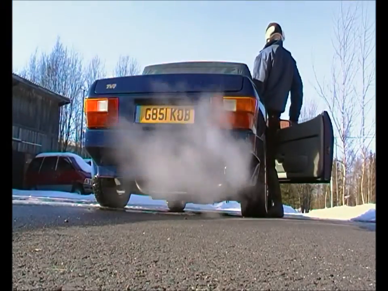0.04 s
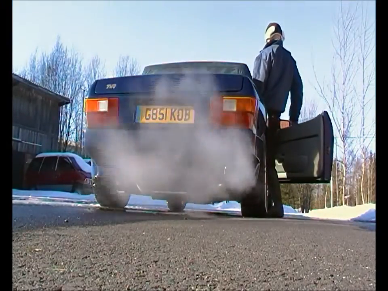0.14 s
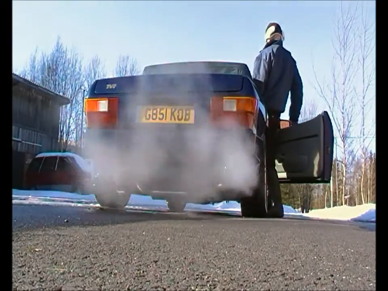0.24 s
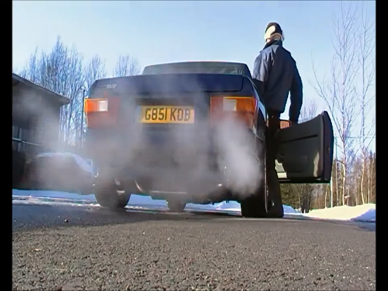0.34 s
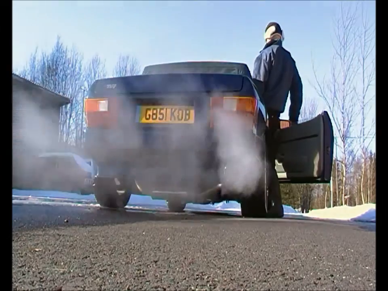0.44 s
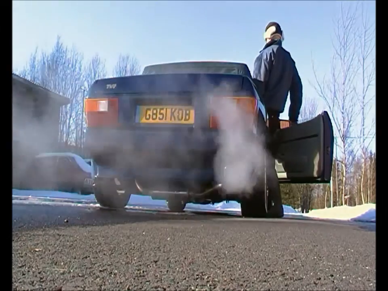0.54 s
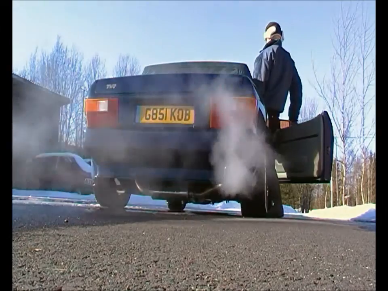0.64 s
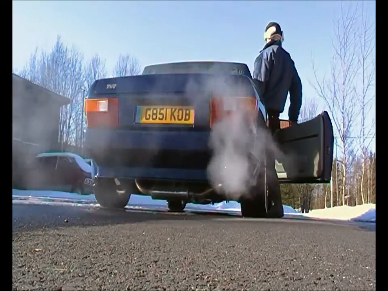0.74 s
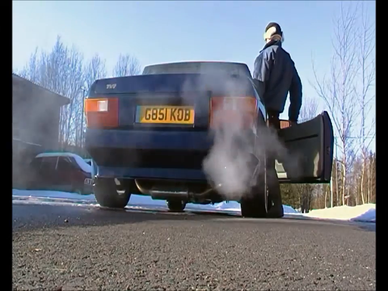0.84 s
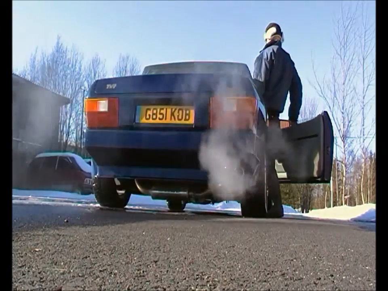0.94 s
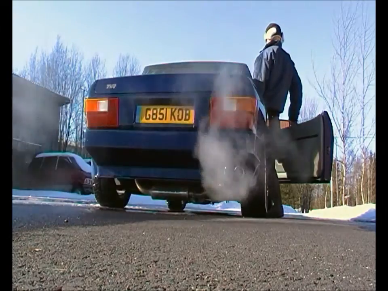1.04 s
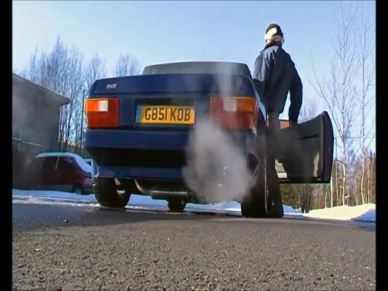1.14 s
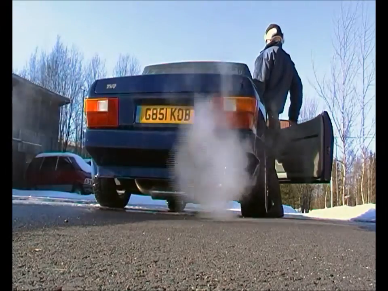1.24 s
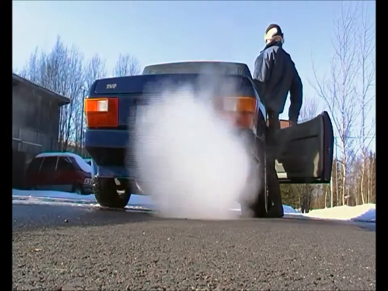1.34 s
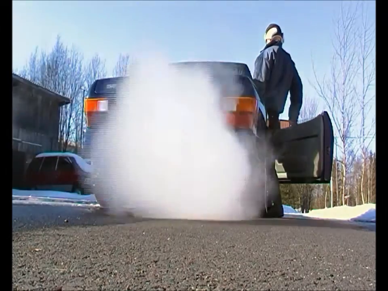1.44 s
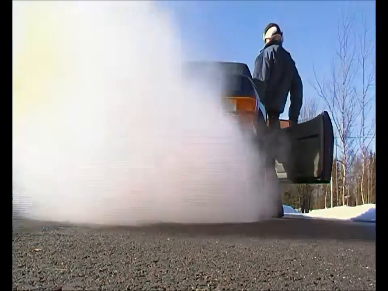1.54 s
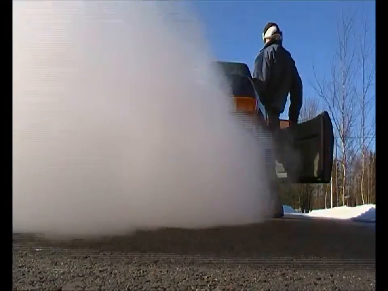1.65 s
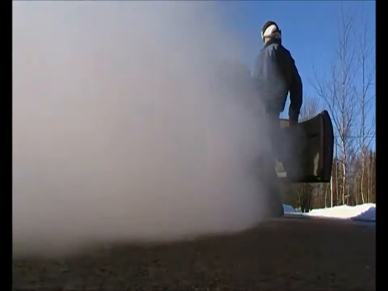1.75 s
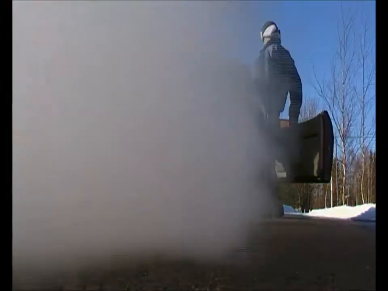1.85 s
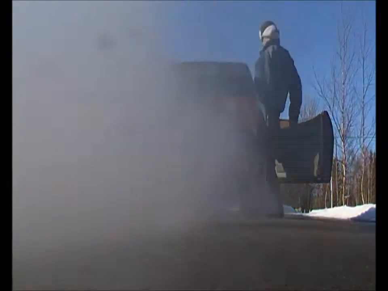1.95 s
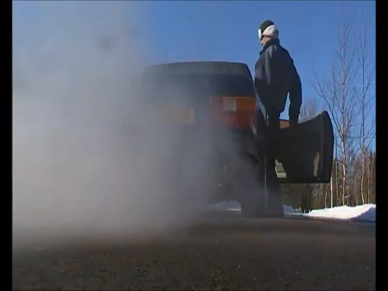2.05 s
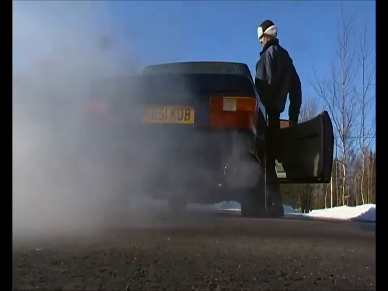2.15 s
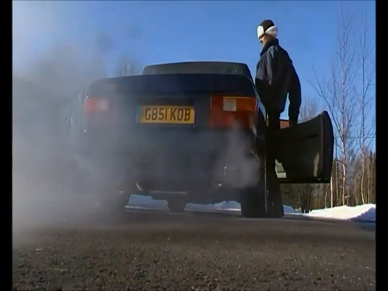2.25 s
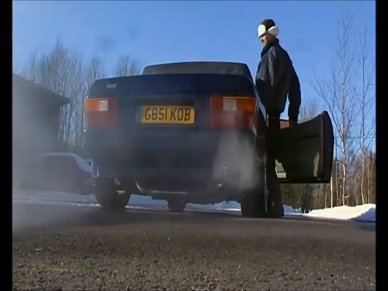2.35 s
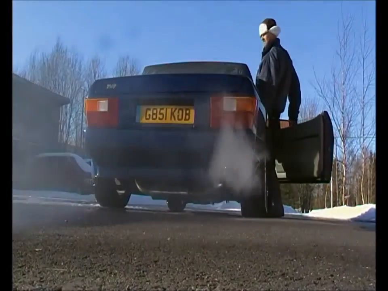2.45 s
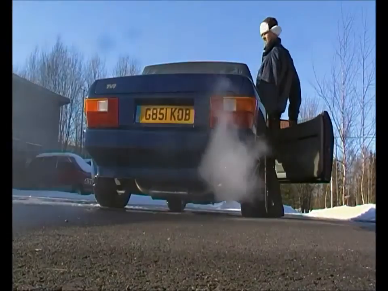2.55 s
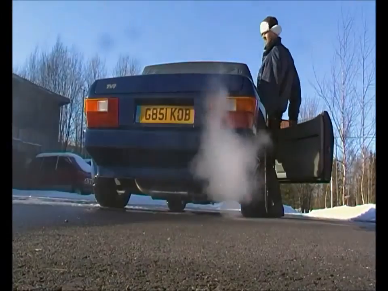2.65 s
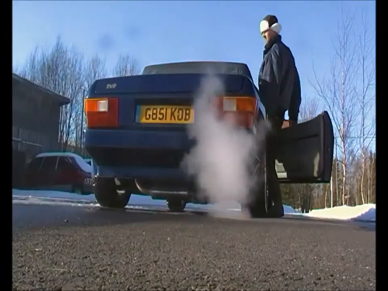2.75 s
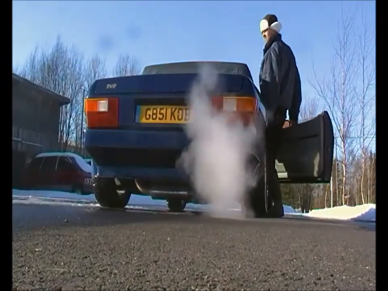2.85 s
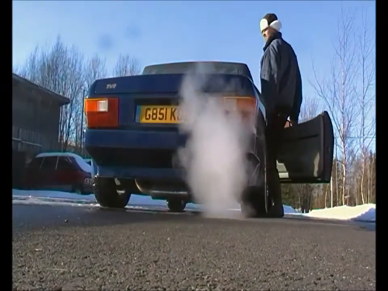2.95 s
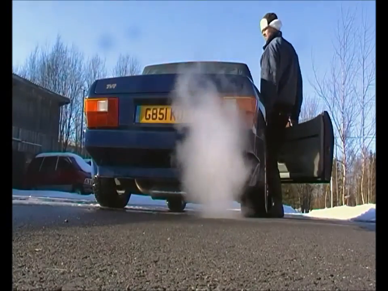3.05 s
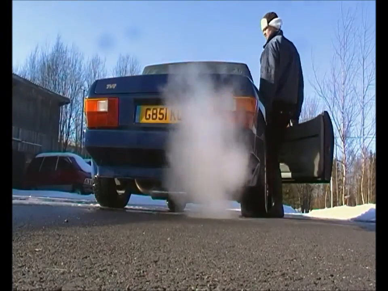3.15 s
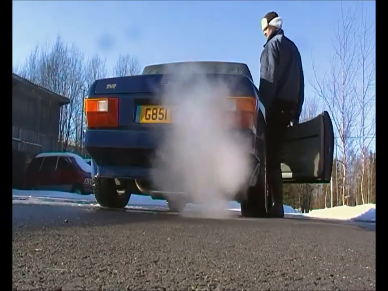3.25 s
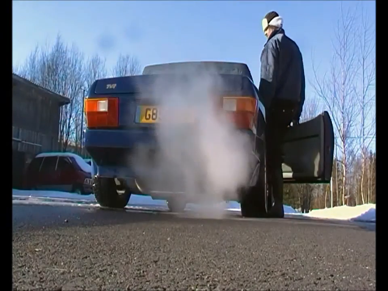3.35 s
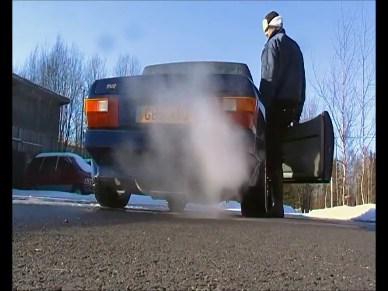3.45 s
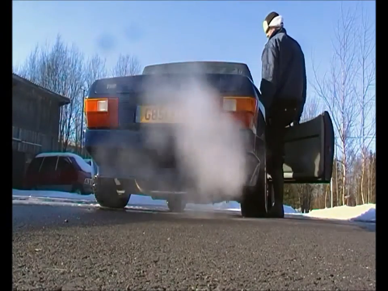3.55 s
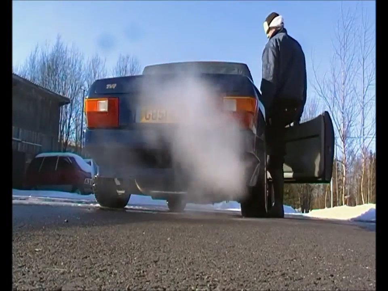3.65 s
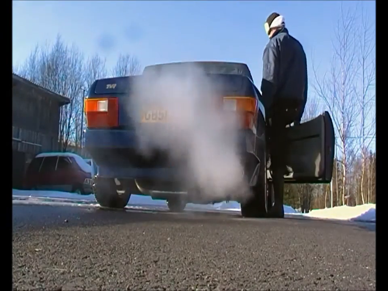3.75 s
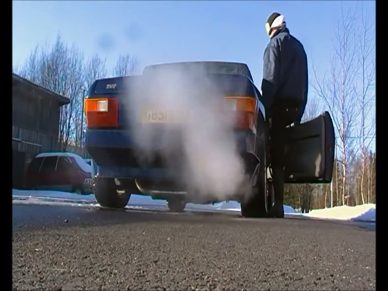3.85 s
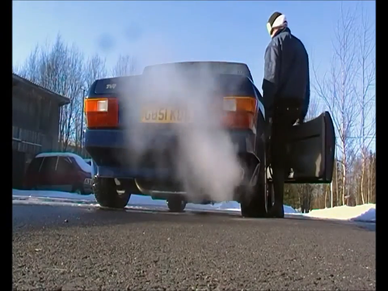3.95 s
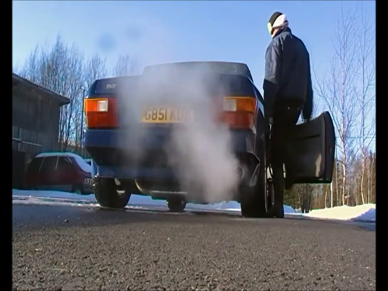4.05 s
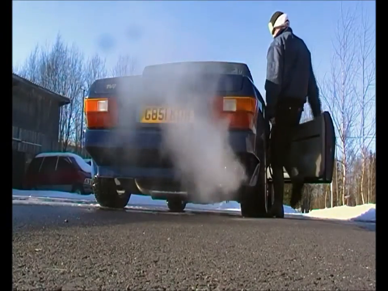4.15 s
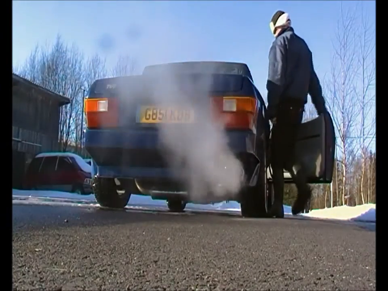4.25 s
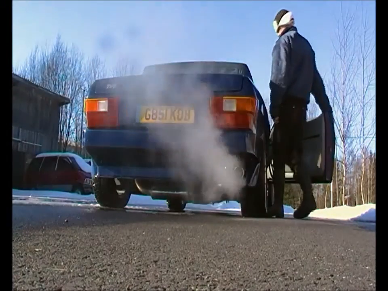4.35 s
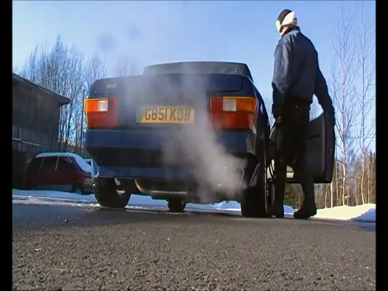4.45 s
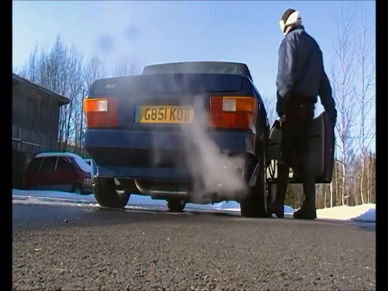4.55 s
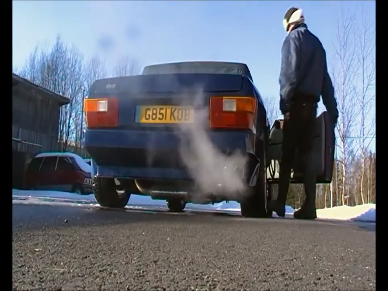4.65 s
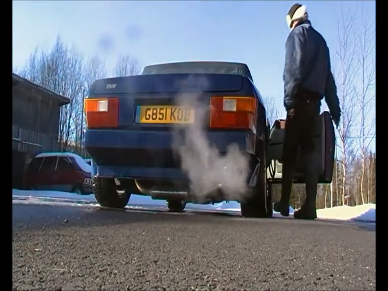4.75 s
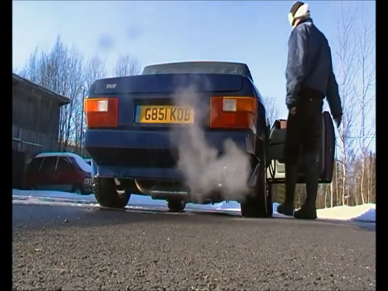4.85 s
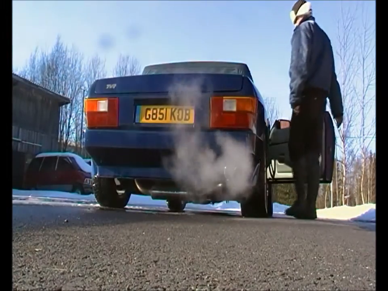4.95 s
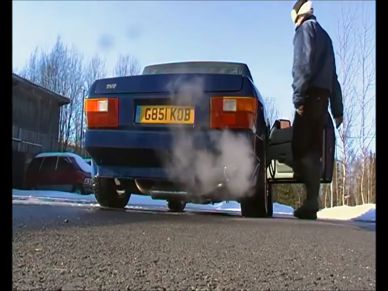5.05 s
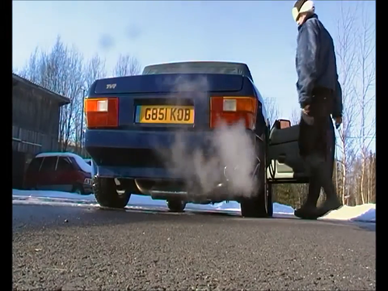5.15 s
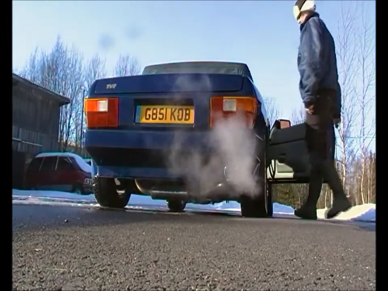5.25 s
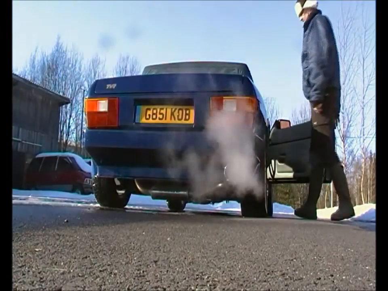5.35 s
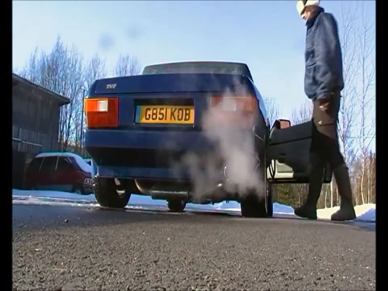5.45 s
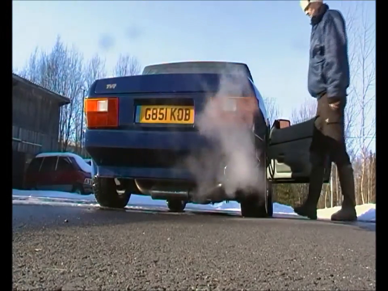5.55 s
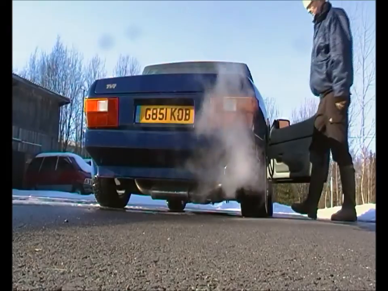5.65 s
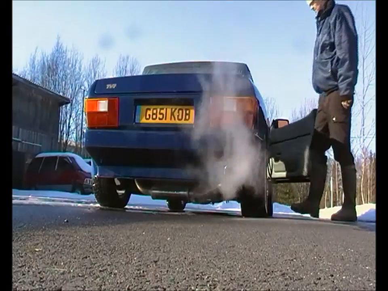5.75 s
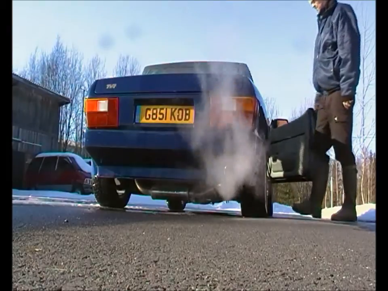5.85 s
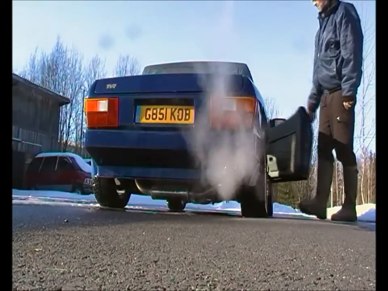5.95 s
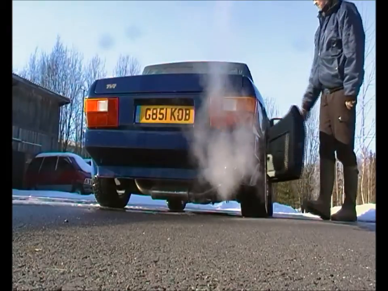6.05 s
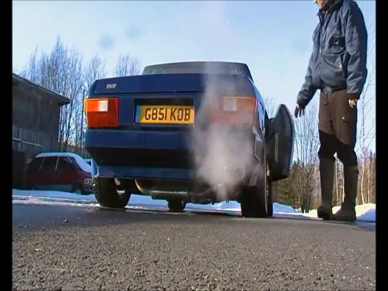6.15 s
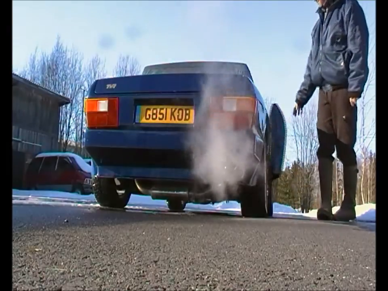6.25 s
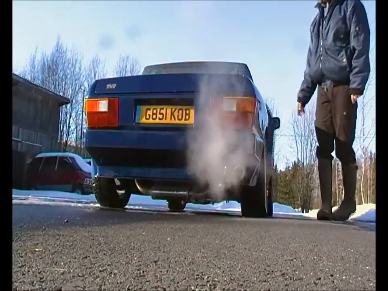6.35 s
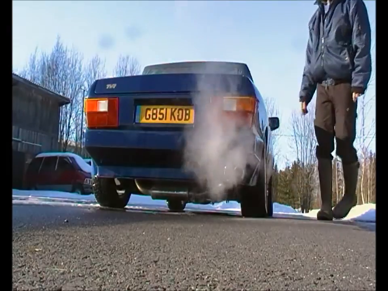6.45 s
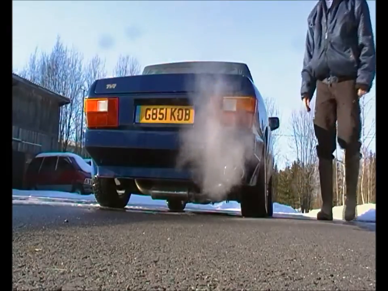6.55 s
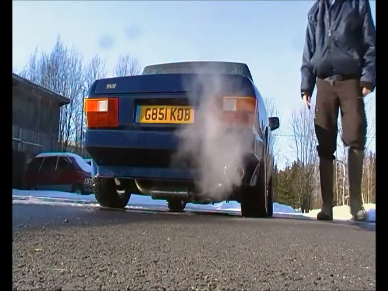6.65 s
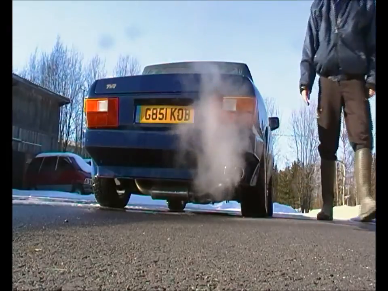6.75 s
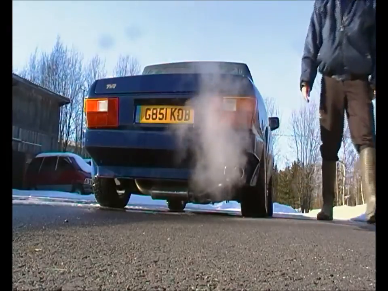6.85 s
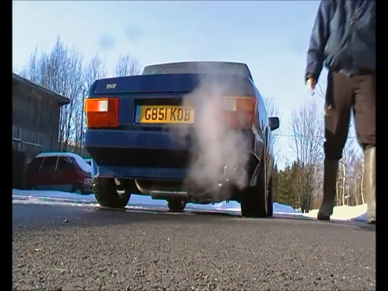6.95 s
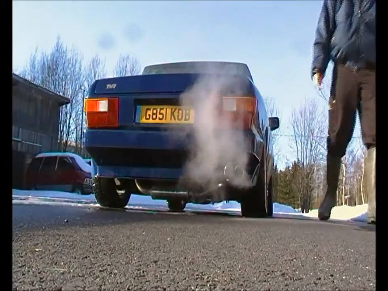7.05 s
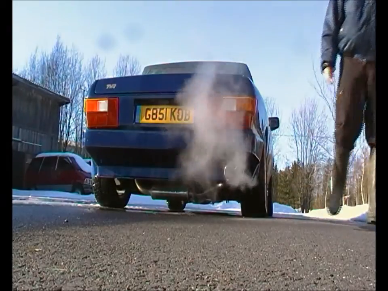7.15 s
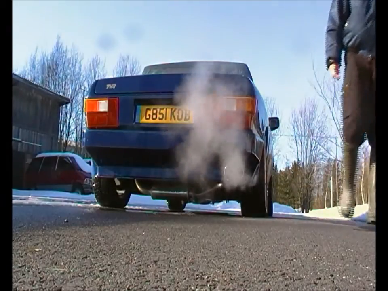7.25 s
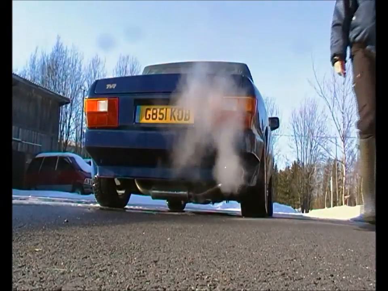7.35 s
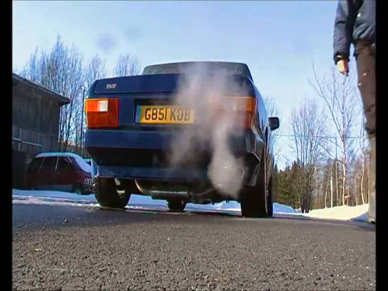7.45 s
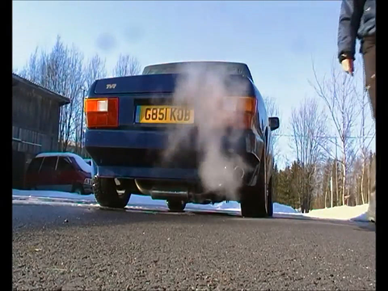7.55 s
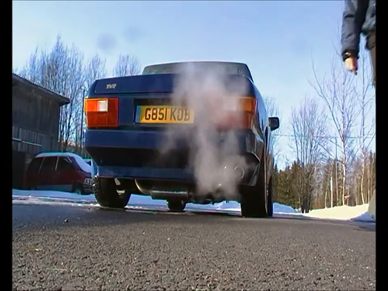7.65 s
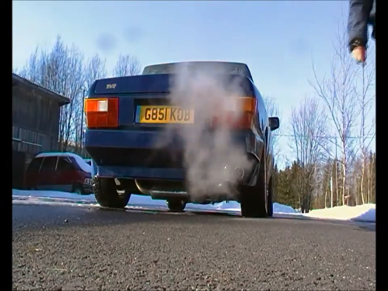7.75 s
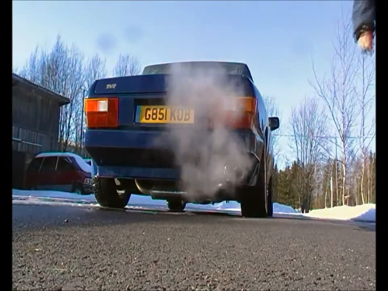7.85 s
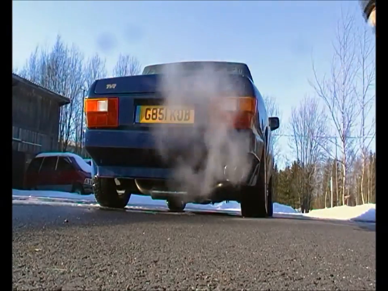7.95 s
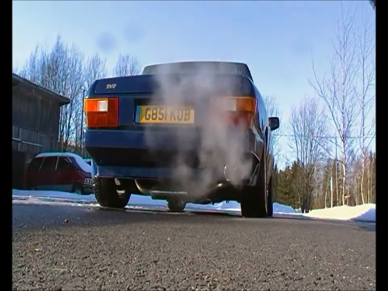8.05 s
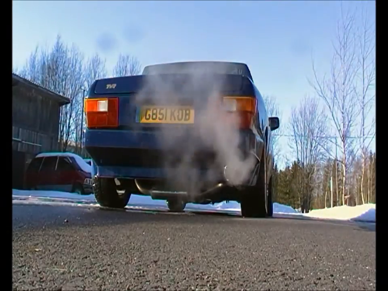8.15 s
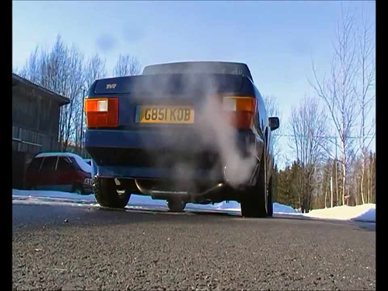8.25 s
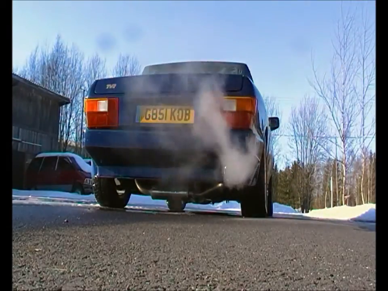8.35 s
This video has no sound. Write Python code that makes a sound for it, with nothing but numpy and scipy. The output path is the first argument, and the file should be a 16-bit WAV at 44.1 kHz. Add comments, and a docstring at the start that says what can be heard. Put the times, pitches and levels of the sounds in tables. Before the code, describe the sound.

Close behind the exhaust, a car engine gives one rasping rev, backfires down to a throbbing idle, and a door thuds shut.

```python
"""An open road, with a stereo microphone close behind the tailpipe of a cross-plane V8.
The engine sinks back from a blip, barks and rasps through one hard rev, then coasts down droning.
It misfires, unburnt fuel pops in the pipe, and it settles to an even idle; later the door is pushed shut.
Gas rush and belt whine follow the revs. The cloud of exhaust buffets the microphone,
and the recorder's gain control ducks under the rev."""
import sys
import numpy as np
from scipy import signal
from scipy.fft import rfft, irfft, next_fast_len
from scipy.io import wavfile
from scipy.ndimage import uniform_filter1d

SR = 44100
rng = np.random.default_rng(int(sys.argv[2]) if len(sys.argv) > 2 else 0)


def bounce(signal):
    """Save signal as a 16-bit WAV file at the path given by the first command-line argument."""
    frames = np.transpose(np.atleast_2d(signal))
    limited = np.clip(frames, -1, 1)
    pcm = np.round(limited * 32767).astype(np.int16)
    wavfile.write(sys.argv[1], SR, pcm)


N = 370881

# how alike noise is on the two sides of the microphone: freq_hz, likeness (0-1)
STEREO_LIKENESS = [(100, .96), (600, .95), (1200, .9), (2500, .9), (4500, .76), (9000, .68)]
# steady resonances of the engine bay: pitch_hz, width_hz, level_db
BAY_MODES = [(767, 31, -53.5), (1468, 68, -53), (1684, 50, -55.5), (2464, 34, -57), (2924, 61, -53.5)]
# latch and door striking the frame: start_s, panel_db, latch_db, t60_s
DOOR_HITS = [(6.5385, -19, -16, 0.067), (6.55, -18, -15, 0.036), (6.557, -15.5, -26, 0.079),
             (6.566, -20, -26, 0.11), (6.592, -21, -26.5, 0.057), (6.609, -28, -53, 0.097)]
# spectra of the door panel and its latch: freq_hz, level_db
PANEL_COLOUR = [(40, -18), (120, 3), (300, -2), (550, -1.5), (850, -2), (1300, -5), (2000, -9.5),
                (4000, -33), (10000, -43)]
LATCH_COLOUR = [(500, -23), (1500, 2), (2700, 5), (3800, 6), (5000, -3), (7000, -10.5), (11000, -19.5)]
# exhaust gusts on the microphone: peak_s, level_db
GUSTS = [(2.085, -4.5), (2.15, -14.5)]
# tones of the belt-driven parts: cycle_multiple, relative_db
WHINE_ORDERS = [(35.3, -4.5), (76.2, -9.5), (118, -17.5)]
# how well the whine radiates: freq_hz, gain_db
WHINE_RADIATION = [(780, -13), (1020, -0.5), (1250, -11), (1450, 3.5), (2200, -9.5), (3100, 6), (5500, 6)]
# spectra of the gas rush and the jet hiss at the tailpipe: freq_hz, level_db
RUSH_COLOUR = [(320, -10.5), (550, -1), (607, -10), (755, -4.5), (824, -4.5), (1100, -7.5), (1410, -7),
               (2060, -7), (2410, -5.5), (3230, -6), (3980, -8), (5230, -14), (7500, -21.5), (9750, -30),
               (16500, -120)]
JET_COLOUR = [(3500, -14), (6000, 3), (7500, -1.5), (9500, 2), (11000, -3.5), (12000, -43)]
# spits of hiss as the revs climb: peak_s, half_length_s, level_db
SPITS = [(1.185, 0.077, -34), (1.45, 0.089, -28.5)]
# unburnt fuel exploding in the exhaust: start_s, peak_db
POPS = [(0.2181, -5), (0.2552, -15.5), (2.5311, 1), (2.5613, 4), (2.5782, -1), (2.5912, -1), (2.6323, -7),
        (2.6456, -2.5), (2.6972, -4.5), (2.7089, 0.5), (2.7229, -5.5), (2.7803, 0), (2.9062, 4),
        (2.9545, 2), (2.9641, 2), (2.9842, 3.5), (3.0105, -1), (3.1091, 4), (3.1377, 0), (3.1658, -1.5),
        (3.1718, 2), (3.3035, -2), (3.3282, -10.5), (3.5511, -10.5), (3.633, -12.5), (3.806, -17),
        (4.165, -11.5), (4.44, -23), (4.499, -28), (4.777, -20)]
# spectra of the pipe rung by a pop and of the pop's shock: freq_hz, level_db
POP_PIPE = [(40, -31), (150, -3.5), (270, 10), (350, 5.5), (450, 11.5), (600, -2.5), (900, -9), (1500, -36),
            (3000, -32), (9000, -75)]
CRACK_COLOUR = [(300, -20), (700, -8), (1200, 5), (2200, -1), (4000, -21), (9000, -39)]
# cylinders in firing order: bank (0 or 1), light_load_db, throttle_db
CYLINDERS = [(0, -0.5, -3.5), (1, 1.5, -2.5), (1, -1, -10), (0, -5, -9.5), (1, -14, -2), (0, -2, -0.5),
             (0, 2, -3), (1, -6.5, -7)]
# tones of the even idle and of the slowing engine's lope: cycle_multiple, relative_db
IDLE_ORDERS = [(6, -26), (7, -44), (8, 15.5), (16, 13), (18, -23), (19, 0), (25, -8), (27, -0.5), (29, -31),
               (31, -38), (32, 6), (33, -28), (35, 3), (46, -7)]
LOPE_ORDERS = [(4, -5.5), (5, -9), (6, 5), (8, 3.5), (11, -11), (16, -17), (24, -1)]
# tones of the coasting drone, which shift part of the way from early to late:
# cycle_multiple, early_db, late_db
COAST_ORDERS = [(2, -19, -24), (4, -8, -3), (5, -6.5, -15), (6, 4.5, -0.5), (7, -20, 6), (8, -1.5, 4),
                (9, -34, -44), (10, -5, -12), (11, 2, -3.5), (12, -9, -16), (13, -9.5, -36), (14, -22, 4.5),
                (15, -12, -8), (16, -43, -31)]
# spectra of the exhaust pulses at light load, under throttle, and of their rasp: freq_hz, level_db
BURBLE_PIPE = [(25, -55), (42, -9), (56, 7.5), (80, -6), (105, -10.5), (140, 1.5), (182, -13), (225, 3.5),
               (280, 2.5), (340, -4.5), (420, -5.5), (560, -35.5), (1000, -28.5), (3000, -65)]
THROTTLE_PIPE = [(30, -42), (70, -28), (115, 7), (220, 3.5), (340, 8.5), (480, 2.5), (600, -6.5),
                 (760, -20), (1100, -17), (1600, -24), (3000, -27), (8000, -41.5)]
RASP_PIPE = [(200, -28), (500, -3), (740, -2), (1100, -8), (1400, -18.5), (1900, -16), (3000, -32),
             (8000, -43.5)]

# engine speeds are firings per second (Hz); a four-stroke cycle holds eight firings
START_HZ, IDLE_HZ = 124.4, 64.4
DRONE_HZ, MISFIRE_HZ, SETTLE_HZ = 245, 230, 76.2  # falling: misfires come in, take over, start to even out
# growth of each sound with engine speed: idle_db, db_per_octave, limit_hz
WHINE_LAW, RUSH_LAW, JET_LAW = (-42, 10.5, 234), (-42, 10.73, 252), (-54.5, 11.24, 274)
BURBLE_LAW, COAST_LAW, BARK_LAW = (-36, 13.17, 155), (-61.5, 22.66, 287), (-19.5, 7.97, 327)
BITE, FULL_LOAD = 0.25, 0.69  # pedal travel (0-1) where the bark starts and where it takes over


def from_db(db):
    """Decibels to gain."""
    return np.exp(np.asarray(db) * (np.log(10) / 20))


def rms_one(x):
    """Scale to unit power."""
    return x / np.sqrt(np.mean(x ** 2) + 1e-20)


def clock():
    """The time of every sample in seconds."""
    return np.arange(N) / SR


def ramp(x, start, end):
    """0 at start, 1 at end, straight between and held outside."""
    return np.clip((x - start) / (end - start), 0, 1)


def at_hz(points, hz):
    """Read a spectrum on a log-frequency axis."""
    freq_hz, value = np.transpose(points)
    return np.interp(np.log(hz + 1), np.log(freq_hz), value)


def drift(rate_hz):
    """A random wander with a spread of about 1."""
    knots = rng.standard_normal(4096)
    return np.interp(np.linspace(0, N / SR * rate_hz, N), np.arange(len(knots)), knots)


def response(spectrum, size=8192):
    """Causal (minimum-phase) impulse response with a given colour."""
    gain = from_db(at_hz(spectrum, np.arange(size // 2 + 1) * SR / size))
    cepstrum = irfft(np.log(gain))
    cepstrum[1:size // 2] *= 2
    cepstrum[size // 2 + 1:] = 0
    return irfft(np.exp(rfft(cepstrum)))


def through(x, impulse):
    """Send a signal through an impulse response."""
    return signal.oaconvolve(x, impulse)[:N]


def noise(spectrum):
    """Coloured stereo noise of unit power, less alike left and right towards the treble."""
    size = next_fast_len(N, real=True)
    hz = np.arange(size // 2 + 1) * SR / size
    mid, side = rfft(rng.standard_normal((2, size))) * from_db(at_hz(spectrum, hz))
    alike = at_hz(STEREO_LIKENESS, hz)
    left_right = np.sqrt(1 + alike) * mid + np.sqrt(1 - alike) * side * [[1], [-1]]
    return rms_one(irfft(left_right, size)[:, :N])


def evened(x, window_s=0.066):
    """Hold the slow level at 1, so that only the beat-to-beat unevenness is left."""
    size = int(window_s * SR / 2)
    power = uniform_filter1d(uniform_filter1d(x ** 2, size), size)
    return x / np.sqrt(np.abs(power) + 1e-12)


def by_speed(law, speed):
    """Gain of a sound that grows with engine speed up to a limit."""
    idle_db, db_per_octave, limit_hz = law
    return from_db(idle_db + db_per_octave * np.log2(np.minimum(speed, limit_hz) / IDLE_HZ))


def open_air():
    """A faint, low wash of outdoor noise all round the microphone."""
    colour = [(15, -13), (50, -2.5), (200, 5), (500, -11.5), (1000, -12.5), (4000, -31.5)]
    return from_db(-40) * noise(colour)


def roadside_scatter(x, t60_s=0.64, echo_db=-19):
    """Faint, dull echoes off the road, a shed and trees, different on each side of the microphone."""
    t = np.arange(SR // 4) / SR
    tails = signal.sosfilt(signal.butter(1, 900, fs=SR, output="sos"), rng.standard_normal((2, len(t))))
    tails = tails * from_db(-60 * t / t60_s) * (t > .004)
    passband = np.sqrt(np.mean(np.abs(rfft(tails)[:, :len(t) // 80]) ** 2))
    return np.array([through(side, from_db(echo_db) * tail / passband) for side, tail in zip(x, tails)])


def engine_bay():
    """At the far end of the car, fan and valve gear keep a few narrow resonances sounding."""
    ringing = np.zeros(N)
    for pitch_hz, width_hz, level_db in BAY_MODES:
        phase = 2 * np.pi * pitch_hz * clock()
        band = drift(2 * width_hz) * np.cos(phase) + drift(2 * width_hz) * np.sin(phase)
        ringing += from_db(level_db) * rms_one(band)
    return ringing


def door():
    """The latch snaps over its two catches, the panel slams home and rattles briefly."""
    t, panel, latch = clock()[:SR // 2], np.zeros(N), np.zeros(N)
    for start_s, panel_db, latch_db, t60_s in DOOR_HITS:
        at = int(start_s * SR)
        decay = from_db(-60 * t / t60_s)
        panel[at:at + len(t)] += from_db(panel_db) * decay
        latch[at:at + len(t)] += from_db(latch_db) * decay
    return panel * noise(PANEL_COLOUR) + latch * noise(LATCH_COLOUR)


def belt(cycle, speed, load, loaded_db=-6, waver_db=2.5):
    """The belt drive whines on high multiples of the cycle, most clearly with the throttle shut."""
    whine = np.zeros(N)
    for k, db in WHINE_ORDERS:
        radiation_db = at_hz(WHINE_RADIATION, speed * k / len(CYLINDERS))
        gain = from_db(db + radiation_db + waver_db * drift(24.88))
        whine += gain * np.sin(2 * np.pi * k * cycle + .018 * k * drift(110))
    return by_speed(WHINE_LAW, speed) * from_db(loaded_db * load) * whine


def buffet(rise_s=0.017, fall_s=0.013):
    """The exhaust cloud hits the microphone as a short low rumble, a little different at each port."""
    t, gusts = clock(), np.zeros(N)
    for peak_s, level_db in GUSTS:
        fade = np.maximum((peak_s - t) / rise_s, (t - peak_s) / fall_s)
        gusts += from_db(level_db) * np.exp(-np.minimum(fade, 20))
    rumble = response([(12, 0), (30, -8), (70, -7), (140, -6), (220, -3), (600, -21), (3000, -65)])
    ports = rng.standard_normal(N) + from_db(-9) * rng.standard_normal((2, N))
    return gusts * np.array([rms_one(through(port, rumble)) for port in ports])


def gas_rush(speed, flow):
    """Gas rush and jet hiss at the tailpipe grow with speed and flutter with the exhaust flow."""
    flutter = rms_one(from_db(0.27 * np.clip(evened(flow), -3, 3) + 0.71 * drift(70)))
    spits = sum(from_db(db) * np.exp(-np.minimum(((clock() - peak_s) / half_s) ** 2, 20))
                for peak_s, half_s, db in SPITS)
    rush = by_speed(RUSH_LAW, speed) * noise(RUSH_COLOUR)
    jet = (by_speed(JET_LAW, speed) + spits) * noise(JET_COLOUR)
    return flutter * (rush + jet)


def pops(crack_db=-21, crack_t60_s=.022):
    """Each explosion runs down the pipe and rings it; the strongest steepen into a cracking shock."""
    start_s, peak_db = np.transpose(POPS)
    clicks = np.bincount((start_s * SR).astype(int), from_db(peak_db), N)
    ring = response(POP_PIPE)
    crack_decay = from_db(crack_db - 60 * clock()[:SR // 10] / crack_t60_s)
    cracks = through(clicks ** 1.5, crack_decay) * noise(CRACK_COLOUR)
    return through(clicks, ring / np.abs(ring).max()) + cracks


def pedal(t, down_s=.964, press_s=.307, up_s=1.817, lift_s=.199):
    """Throttle opening (0-1) for one stab of the pedal: pressed, held, lifted."""
    return np.clip(np.minimum((t - down_s) / press_s, (up_s - t) / lift_s), 0, 1)


def flywheel(step_s=.001):
    """Firings per second: the throttle pulls the speed up, drag brings it back to idle."""
    hz, speeds = START_HZ, []
    t = np.arange(0, N / SR, step_s)
    for opening in pedal(t):
        speeds.append(hz)
        pull_hz_per_s = opening * 578.3 * (hz / 200) ** .281
        drag_hz_per_s = 86.8 * (max(hz - IDLE_HZ, 0) / 100) ** .688
        hz += (pull_hz_per_s - drag_hz_per_s) * step_s
    return np.interp(clock(), t, speeds)


def firings(cycle, cylinder_db, scatter_db, bank_lag_s, jitter_s):
    """One click per exhaust stroke; one bank reaches the tailpipe later than the other."""
    at = np.flatnonzero(np.diff(np.floor(len(CYLINDERS) * cycle)))
    cylinder = np.arange(len(at)) % len(CYLINDERS)
    bank = np.array(CYLINDERS)[cylinder, 0]
    burn, timing = rng.standard_normal((2000, 2))[:len(at)].T
    late_s = bank_lag_s * bank + np.broadcast_to(jitter_s, N)[at] * timing
    # a charge can burn far too weakly, but hardly too well
    burn_db = np.broadcast_to(scatter_db, N)[at] * np.minimum(burn, 1)
    arrival = np.clip(at + (late_s * SR).astype(int), 0, N)
    return np.bincount(arrival, from_db(cylinder_db[cylinder] + burn_db), N + 1)[:N]


def muffler(x, reflection):
    """Three chambers hand each pulse on in a train of echoes (all-pass), rounding off the knocks."""
    for lag_s in (.0019, .0031, .0047):
        lag = int(lag_s * SR)
        echoes = np.zeros(12 * lag + 1)
        echoes[0] = -reflection
        echoes[lag::lag] = (1 - reflection ** 2) * reflection ** np.arange(12)
        x = through(x, echoes)
    return x


def pipe_tones(cycle, orders, smear):
    """Clean multiples of the cycle; the pipe delays the higher ones, which smears each beat."""
    return evened(sum(from_db(db) * np.cos(2 * np.pi * k * cycle - smear * k ** 2) for k, db in orders))


def throb(cycle, depth, peak_at=0.37):
    """Gain that swells once per four-stroke cycle."""
    return 1 + depth * np.cos(2 * np.pi * (cycle - peak_at))


def idle(cycle, hum_db=-29.5):
    """Once every cylinder catches, the firing rate hums; its upper tones swell once a cycle."""
    throb_db = 20 * np.log10(throb(cycle, depth=0.67))
    orders = [(k, db + 1.2 * drift(8.8) + (k > 20) * throb_db) for k, db in IDLE_ORDERS]
    return -from_db(hum_db) * pipe_tones(cycle, orders, smear=0.0019)


def burble(cycle, speed, settled, misfire_scatter_db=9.5, idle_scatter_db=1.5):
    """At light load the cylinders fire unevenly and the banks lope; at idle they throb evenly."""
    scatter_db = misfire_scatter_db + settled * (idle_scatter_db - misfire_scatter_db)
    jitter_s = 0.0004 * (1 - .7 * settled)
    clicks = firings(cycle, np.array(CYLINDERS)[:, 1], scatter_db, bank_lag_s=0.00308, jitter_s=jitter_s)
    strokes = muffler(through(clicks, response(BURBLE_PIPE)), reflection=0.68)
    pulses = evened(strokes, window_s=.12)
    # each tone of the lope swells as it slides across a resonance of the pipe
    orders = [(k, db + at_hz(BURBLE_PIPE, speed * k / len(CYLINDERS)) + 5 * drift(16))
              for k, db in LOPE_ORDERS]
    lope = from_db(-7) * (1 - settled) * pipe_tones(cycle, orders, smear=0.0289)
    beat = from_db(-4 * settled) * throb(cycle, depth=.55 * settled)
    return by_speed(BURBLE_LAW, speed) * (beat * pulses + lope)


def coast(cycle, speed, early_hz=304, late_hz=280):
    """With the throttle shut the engine pumps a rough drone whose strongest tones shift as it slows."""
    shift = 0.75 * ramp(speed, early_hz, late_hz)
    orders = [(k, early_db + shift * (late_db - early_db) + 2 * drift(22))
              for k, early_db, late_db in COAST_ORDERS]
    drone = pipe_tones(cycle, orders, smear=0.046)
    churn = noise([(90, -23), (220, 1), (440, 10), (620, -13), (900, -39), (2000, -29)]) * np.abs(drone)
    return by_speed(COAST_LAW, speed) * (drone + from_db(-9) * churn)


def bark(cycle, speed, echo_s=0.0035):
    """Under throttle, round blow-down pulses leave the pipe, gaining rasp and turbulence with speed."""
    clicks = firings(cycle, np.array(CYLINDERS)[:, 2], scatter_db=3.2, bank_lag_s=.00055, jitter_s=.00018)
    # pressure builds and falls alike on both sides of each stroke: a symmetric pulse
    size = next_fast_len(N, real=True)
    pipe_gain = from_db(at_hz(THROTTLE_PIPE, np.arange(size // 2 + 1) * SR / size))
    pressure = -irfft(rfft(clicks, size) * pipe_gain, size)[:N]
    strokes = muffler(pressure, reflection=.22)
    # the open pipe end sends back an inverted echo, which favours some tones as the speed sweeps past
    echo = np.interp(clock() - echo_s, clock(), strokes)
    pulses = evened(strokes - 0.094 * echo, window_s=0.038)
    rasp = evened(-through(clicks, response(RASP_PIPE)), window_s=0.12)
    puffs = noise(RASP_PIPE) * (.5 + 0.29 * np.abs(pulses))
    force = (speed / speed.max()) ** 1.96
    return by_speed(BARK_LAW, speed) * (pulses + force * (from_db(-7.5) * rasp + from_db(-0.5) * puffs))


def scene():
    """The car stands straight ahead of the microphone; its exhaust follows the pedal and crankshaft."""
    speed = flywheel()
    cycle = np.cumsum(speed) / SR / len(CYLINDERS)
    load = ramp(pedal(clock()), BITE, FULL_LOAD) ** 1.63
    misfiring = ramp(speed, DRONE_HZ, MISFIRE_HZ)
    settled = ramp(speed, SETTLE_HZ, IDLE_HZ)
    # as the engine slows, the drone steps back and the uneven firing comes forward
    drone = from_db(-6 * misfiring) * coast(cycle, speed)
    burbling = from_db(-5 * (1 - misfiring)) * burble(cycle, speed, settled)
    unloaded = drone + burbling + settled * idle(cycle)
    exhaust = load * bark(cycle, speed) + (1 - load) * unloaded
    hiss_lift_db = 1.5 * (1.5 - load) * (1 - misfiring)  # greatest at high revs with the throttle shut
    gas = from_db(hiss_lift_db) * gas_rush(speed, exhaust[0])
    car = exhaust + pops() + gas + belt(cycle, speed, load) + engine_bay() + door()
    return open_air() + car + roadside_scatter(car) + buffet()


def record(dry, ceiling_db=-13, detect_s=0.052, recover_db_per_s=50, cutoff_hz=11400):
    """The recorder ducks above its ceiling and creeps back; the loudest pops clip, and the top is cut."""
    smoothing = np.exp(-1 / (detect_s * SR))
    power = signal.lfilter([1 - smoothing], [1, -smoothing], np.mean(dry ** 2, axis=0))
    over_db = np.maximum(10 * np.log10(power + 1e-12) - ceiling_db, 0)
    recovery_db = recover_db_per_s * clock()
    duck_db = np.maximum.accumulate(over_db + recovery_db) - recovery_db
    clipped = np.clip(dry * from_db(-duck_db), -.98, .98)
    return signal.sosfilt(signal.ellip(10, .1, 80, cutoff_hz, fs=SR, output="sos"), clipped)


dry = scene()
out = record(dry)
bounce(out)
```